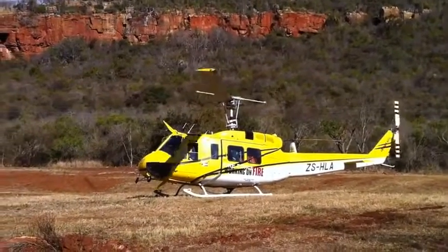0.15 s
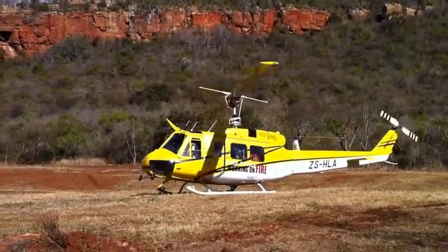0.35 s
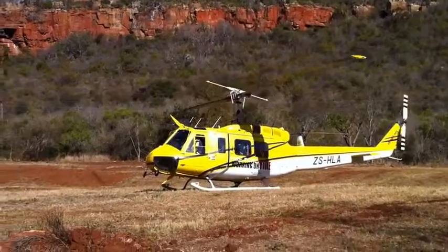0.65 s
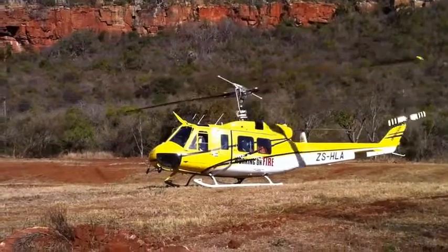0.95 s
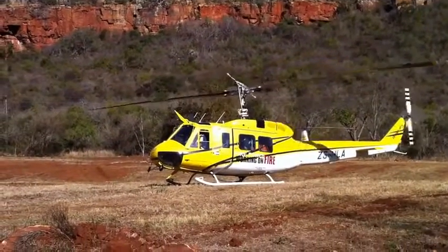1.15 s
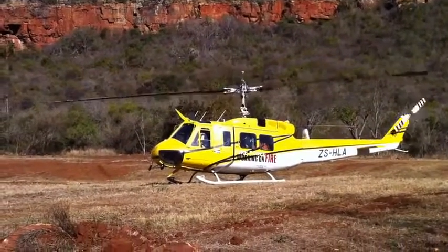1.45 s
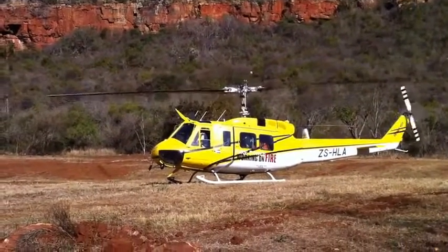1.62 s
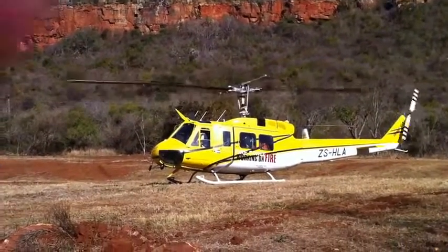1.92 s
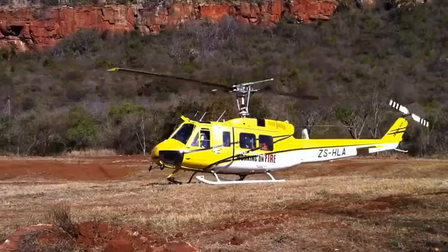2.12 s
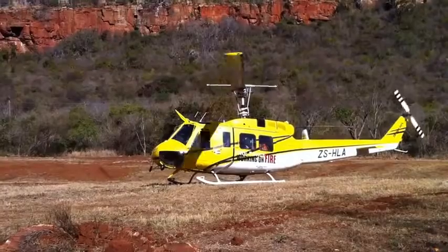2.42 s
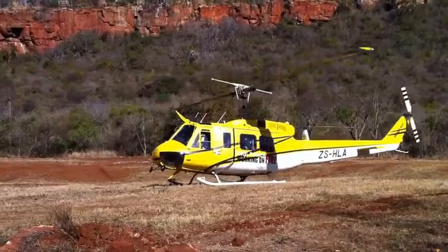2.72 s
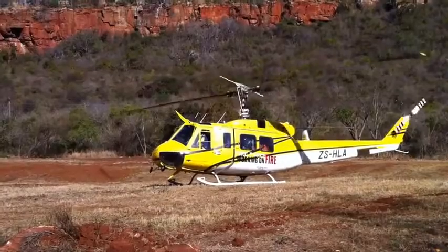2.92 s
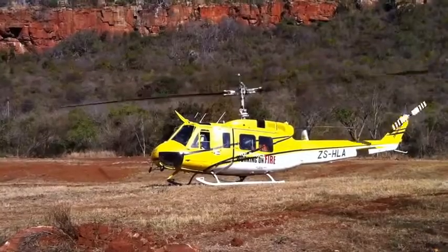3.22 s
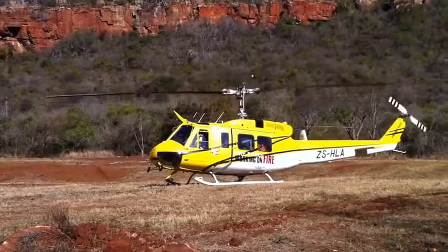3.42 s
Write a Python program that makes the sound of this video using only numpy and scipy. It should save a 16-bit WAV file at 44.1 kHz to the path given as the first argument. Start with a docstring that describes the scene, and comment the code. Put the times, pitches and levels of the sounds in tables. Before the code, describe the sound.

A helicopter's turbine whine climbs steadily through broad hiss, with hollow blade swishes passing

```python
"""Open ground, some way from a helicopter whose turbine spools up.
The compressor whistles on multiples of its rising shaft speed; a lower gear whine climbs faster with the rotor.
The burner rumbles and the exhaust hisses; passing main blades sweep an inverted echo through the engine sound
and roughen the whistles. Moving air makes the tones flutter. Faint hums, soft low swells and one dull knock
on the microphone body lie underneath."""
import sys
import numpy as np
from scipy import signal
from scipy.fft import rfft, irfft
from scipy.io import wavfile
from scipy.ndimage import uniform_filter1d, map_coordinates

SR = 44100
rng = np.random.default_rng(int(sys.argv[2]) if len(sys.argv) > 2 else 0)


def pcm_store(signal):
    """Save signal as 16-bit PCM."""
    levels = np.round(np.clip(np.atleast_2d(signal), -1, 1) * 32767)
    wavfile.write(sys.argv[1], SR, levels.astype(np.int16).T)


N = 156996
TIME = np.arange(N) / SR

# spool-up: (time [s], compressor shaft speed [Hz], gear mesh frequency [Hz])
SPOOL_UP = [(0.0, 238.4, 700.0), (0.45, 245.18, 771.0), (0.9, 252.3, 846.4), (1.35, 259.69, 925.0),
            (1.8, 267.69, 1012.0), (2.25, 275.92, 1103.4), (2.7, 283.29, 1199.0), (3.15, 290.53, 1299.8),
            (3.56, 297.02, 1395.1)]
# main blades reflecting the engine:
# (time [s], 1/e half length [s], echo delay [ms], exponential delay growth [1/s], strength [0-1])
BLADE_PASSES = [(0.531, 0.089, 0.41, 6, 0.8), (1.595, 0.073, 0.274, -4.5, 0.5),
                (2.382, 0.044, 0.253, 3.5, 0.84)]


def gain_of(db):
    """Decibels to gain."""
    return 10 ** (np.asarray(db) / 20)


def evened(x):
    """Scales to rms 1."""
    return x / np.sqrt(np.mean(abs(x) ** 2) + 1e-20)


def curve(points, column=1):
    """One column of a time table, interpolated at every sample."""
    rows = np.array(points)
    return np.interp(TIME, rows[:, 0], rows[:, column])


def spectrum(points, hz):
    """Gain of a spectrum table, interpolated in dB over log frequency."""
    table_hz, db = np.transpose(points)
    return gain_of(np.interp(np.log(hz + 1), np.log(table_hz), db))


def noise_through(gain_at):
    """White noise shaped by a spectrum table."""
    return irfft(rfft(rng.standard_normal(N)) * spectrum(gain_at, np.fft.rfftfreq(N, 1 / SR)), N)


def drift(width_hz):
    """Slow complex noise of rms 1, at half amplitude at width_hz."""
    hz = np.fft.fftfreq(N, 1 / SR)
    white = rng.standard_normal(N) + 1j * rng.standard_normal(N)
    return evened(np.fft.ifft(white / (1 + (hz / width_hz) ** 2)))


def tone(turns, db, flutter, fuzz):
    """A tone heard through moving air: slow flutter and a faint noisy skirt; db sets the rms."""
    air = 1 + flutter * drift(width_hz=21) + fuzz * drift(width_hz=55)
    return np.sqrt(2) * gain_of(db) * (evened(air) * np.exp(2j * np.pi * turns)).real


def compressor():
    """Blade rows whistle on multiples of the shaft speed, over a haze of turbulence that rises with them."""
    # whistle levels by shaft multiple: (time [s], level [dB])
    whistle_17 = [(0, -41), (.11, -30), (.38, -34.5), (.44, -26.5), (.52, -36), (.58, -30), (.63, -30.5),
                  (.71, -26), (.83, -32.5), (.98, -30), (1.04, -30.5), (1.14, -29), (1.24, -33),
                  (1.29, -32), (1.35, -43), (1.42, -33), (1.54, -38), (1.6, -26), (1.65, -41), (1.79, -23),
                  (2.04, -16), (2.3, -23.5), (2.41, -20), (2.48, -20.5), (2.58, -19.5), (2.72, -23),
                  (2.765, -18.5), (2.83, -29.5), (3.0, -19.5), (3.08, -27), (3.19, -22), (3.44, -30.5),
                  (3.53, -23)]
    whistle_18 = [(0, -54), (.38, -61), (.48, -34.5), (.62, -41), (.72, -48), (.97, -39), (1.07, -39),
                  (1.3, -29), (1.51, -28), (1.57, -43), (1.72, -47), (1.81, -33.5), (2.09, -30.5),
                  (2.14, -31), (2.32, -28), (2.39, -31.5), (2.66, -25.5), (2.82, -45), (2.97, -35),
                  (3.03, -46), (3.29, -23), (3.46, -42), (3.52, -42)]
    whistle_19 = [(0.0, -51), (0.1, -33.5), (0.35, -32), (0.45, -25), (0.61, -30.5), (0.87, -40),
                  (1.02, -31), (1.26, -54), (1.64, -45), (1.79, -27.5), (1.9, -49), (2.16, -32),
                  (2.32, -38), (2.36, -52), (2.43, -37), (2.76, -36), (2.81, -31.8), (2.88, -36.5),
                  (3.03, -26), (3.24, -35.5), (3.44, -30.5), (3.55, -35)]
    whistle_33 = [(0, -59), (.4, -47), (0.548, -43.5), (.83, -37.5), (1.25, -44), (1.52, -37.5),
                  (1.78, -44), (3.01, -39), (3.55, -47.5)]
    whistle_34 = [(0, -62), (.62, -41.5), (.86, -53), (1.36, -38.5), (1.47, -50), (1.85, -36),
                  (2.25, -39.5), (2.39, -29), (2.53, -68), (2.93, -44), (3.55, -43)]
    whistle_36 = [(0, -66), (1.8, -61), (1.95, -49), (2.7, -53), (2.9, -59), (3.27, -42.5), (3.55, -41)]
    whistle_38 = [(0, -53), (1.3, -54), (1.63, -44.5), (1.86, -42), (2.2, -50), (2.74, -56), (2.9, -40),
                  (3.08, -53)]
    # fainter tones: (shaft multiple), and (level before growth [dB])
    faint_orders = [1, 15.5, 35, 37, 49.5, 51]
    faint_db = [-46, -45, -80, -51, -61, -62]
    # growth of the faint tones during spool-up: (time [s], level change [dB])
    faint_growth = [(0, -17), (1.3, -5), (1.8, 0.5), (2.7, -3.5), (3.56, 1.5)]
    # turbulence just under the whistles: (shaft multiple, half-amplitude half width [Hz], level before growth [dB])
    haze_bands = [(15.12, 370, -43.5), (32.47, 150, -43.5)]

    turns = np.cumsum(curve(SPOOL_UP, column=1)) / SR
    growth_db = curve(faint_growth)
    out = np.zeros(N)
    for order, level in zip((17, 18, 19), (whistle_17, whistle_18, whistle_19)):
        out += tone(order * turns, curve(level), flutter=0.3, fuzz=0.12)
    for order, level in zip((33, 34, 36, 38), (whistle_33, whistle_34, whistle_36, whistle_38)):
        out += tone(order * turns, curve(level), flutter=0.6, fuzz=0.3)
    for order, db in zip(faint_orders, faint_db):
        out += tone(order * turns, db + growth_db, flutter=1.0, fuzz=0.4)
    for order, width_hz, db in haze_bands:
        band = (drift(width_hz) * np.exp(2j * np.pi * order * turns)).real
        out += gain_of(db + 0.59 * growth_db) * evened(band)
    return out


def gearbox():
    """The gear mesh and its octave climb with the rotor, nearly pure."""
    # gear mesh tone: (time [s], level [dB])
    mesh_level = [(0.0, -48.5), (0.53, -42), (1.14, -53), (1.34, -42.5), (1.62, -30), (2.03, -29.5),
                  (2.08, -27.5), (2.2, -28.5), (2.6, -33), (2.87, -30.5), (3.2, -36.5), (3.55, -38.5)]
    # its octave: (time [s], level [dB])
    octave_level = [(0.0, -53), (0.18, -49), (0.51, -46.5), (1.03, -37), (1.79, -45), (2.08, -40.5),
                    (2.15, -58), (2.5, -37.5), (3.55, -42.5)]
    turns = np.cumsum(curve(SPOOL_UP, column=2)) / SR
    mesh = tone(turns, curve(mesh_level), flutter=0.1, fuzz=0.15)
    octave = tone(2 * turns, curve(octave_level), flutter=0.1, fuzz=0.36)
    return mesh + octave


def exhaust(level_db, patchy_db):
    """Jet hiss that changes colour with speed, in faint drifting patches, and flares at each blade pass."""
    # hiss spectrum at low speed: (frequency [Hz], relative level [dB])
    early_colour = [(40, -45), (200, 0), (380, 2), (510, -7), (780, 4.5), (1100, -0.5), (1400, -5.5),
                    (1700, 1.5), (2100, -3.5), (2700, 1), (3300, -7.5), (4200, 2.5), (5200, -3.5),
                    (6600, -4.5), (7600, -9), (8400, -10), (10300, -17), (13000, -18), (15500, -33)]
    # hiss spectrum at high speed: (frequency [Hz], relative level [dB])
    late_colour = [(40, -34), (200, -6.5), (380, 3), (510, -5), (700, 3.5), (1100, 2.5), (1300, 0),
                   (1480, -4), (1750, 0.5), (2100, -3.5), (2500, 2.5), (2950, -4.5), (3450, 2.5),
                   (3800, -2), (4400, 1), (5200, 2), (5900, -4.5), (6900, -1), (8200, -5), (9300, -3),
                   (10500, -9), (12000, -16), (14000, -20.5), (15500, -28)]
    # start and end of the colour change: (time [s])
    change_s = [0.32, 2.2]
    # hiss level before the level_db offset: (time [s], level [dB])
    hiss_level = [(0, -35.5), (.9, -39), (1.5, -38.5), (1.9, -38), (2.35, -38), (2.6, -38), (3.56, -39)]
    flare_hz, flare_octaves, flare_db = 7600, 0.75, 2.5  # flare_db at pass strength 1

    hz, t, bins = signal.stft(rng.standard_normal(N), SR, nperseg=512, noverlap=384)
    hz = hz[:, None]
    late = np.interp(t, change_s, [0, 1])
    colour = (1 - late) * spectrum(early_colour, hz) + late * spectrum(late_colour, hz)
    patches = uniform_filter1d(rng.standard_normal(bins.shape), size=7, axis=0)  # across frequency
    patches = evened(uniform_filter1d(patches, size=28, axis=1))  # across time
    flare = passing(t) * np.exp(-(np.log2((hz + 1) / flare_hz) / flare_octaves) ** 2)
    shaped = bins * colour * gain_of(patchy_db * patches + flare_db * flare)
    hiss = signal.istft(shaped, nperseg=512, noverlap=384)[1][:N]
    return gain_of(curve(hiss_level) + level_db) * evened(hiss)


def burner():
    """Combustion noise booming in the exhaust pipe."""
    # rumble spectrum: (frequency [Hz], relative level [dB])
    rumble_colour = [(20, -50), (45, -37), (85, -22.5), (105, -17), (130, -8), (160, -4.5), (188, -0.5),
                     (215, -3), (245, -6), (310, -23.5), (450, -30.5), (1000, -70)]
    # rumble level: (time [s], level [dB])
    rumble_level = [(0, -32.5), (.2, -31.5), (.43, -30.5), (.56, -32), (.85, -28), (.91, -32), (.96, -26),
                    (1.24, -35), (1.38, -28.5), (1.87, -34.5), (2.1, -30.5), (2.15, -34.5), (2.47, -31),
                    (2.55, -35), (2.7, -32.5), (2.83, -33), (2.88, -36.5), (3.17, -30.5), (3.56, -33.5)]
    return gain_of(curve(rumble_level)) * evened(noise_through(rumble_colour))


def hums():
    """Faint, wavering hums that hold their pitch."""
    # (frequency [Hz], level [dB])
    hum_tones = [(588, -53), (665, -53.5)]
    return sum(tone(hz * TIME, db, flutter=0.31, fuzz=0.17) for hz, db in hum_tones)


def gusts():
    """Soft swells of deep, narrow rumble: low tones of wandering phase under Gaussian envelopes."""
    # (time [s], pitch [Hz], rms level at the peak [dB])
    swells = [(.1, 114.5, -35.5), (.14, 73, -43), (0.238, 73, -42), (.34, 73, -38.5), (.62, 68, -48),
              (1.1, 66, -45), (1.32, 72.8, -45), (1.57, 70.4, -46), (2.05, 62, -52), (2.5, 66, -51),
              (2.55, 111.6, -39), (2.78, 105, -39), (2.98, 70, -48), (3.46, 70, -49)]
    drift_hz, half_length_s = 6.5, 0.058
    wander = np.exp(1j * drift_hz / 4 * drift(drift_hz).real)
    out = np.zeros(N)
    for s, hz, db in swells:
        envelope = np.exp(-((TIME - s) / half_length_s) ** 2)
        rumble = (wander * np.exp(2j * np.pi * hz * TIME)).real
        out += np.sqrt(2) * gain_of(db) * envelope * rumble
    return out


def passing(t):
    """How strongly a main blade stands in the path of the sound, 0-1."""
    return sum(strength * np.exp(-((t - s) / half_s) ** 2) for s, half_s, _, _, strength in BLADE_PASSES)


def blade_scatter(whistles):
    """Each passing blade scatters the whistles, making them rough for a moment."""
    scatter_db, scatter_width_hz = -9, 160  # scatter_db at pass strength 1
    roughness = evened(drift(scatter_width_hz).real)
    return whistles * (1 + gain_of(scatter_db) * passing(TIME) * roughness)


def blade_echo(engine):
    """Each passing blade adds an inverted echo of gliding delay: a hollow, sweeping swish."""
    cut_hz, top_hz = 2500, 13500  # a narrow, curved blade reflects mostly between these
    hz = np.fft.rfftfreq(N, 1 / SR)
    band = hz ** 2 / (hz ** 2 + cut_hz ** 2) / (1 + (hz / top_hz) ** 4)
    reflected = irfft(rfft(engine) * band, N)
    out = np.zeros(N)
    for s, half_s, delay_ms, growth, strength in BLADE_PASSES:
        near = np.flatnonzero(abs(TIME - s) < 3 * half_s)
        t = TIME[near] - s
        delay_samples = delay_ms / 1000 * SR * np.exp(growth * t)
        echo = map_coordinates(reflected, [near - delay_samples], order=3)
        out[near] -= strength * np.exp(-(t / half_s) ** 2) * echo
    return out


def bump():
    """One dull knock on the microphone body: a short sine burst that swells and dies exponentially."""
    knock_s, knock_db, knock_hz, decay_s = 2.0655, -16.5, 407, 0.00091
    t = TIME - knock_s
    return gain_of(knock_db) * np.exp(-abs(t) / decay_s) * np.sin(2 * np.pi * knock_hz * t)


def scene():
    """All sources at one microphone."""
    engine = blade_scatter(compressor()) + gearbox() + exhaust(level_db=7.5, patchy_db=1.47)
    return (engine + blade_echo(engine) + burner() + hums() + gusts() + bump())[None]


def record(dry):
    """The recorder's band limit: a steep low-pass."""
    edge_hz = 15650
    lowpass = signal.firwin(511, edge_hz, window=("kaiser", 9), fs=SR)
    return signal.oaconvolve(dry, lowpass[None], "same")


dry = scene()
out = record(dry)
pcm_store(out)
```